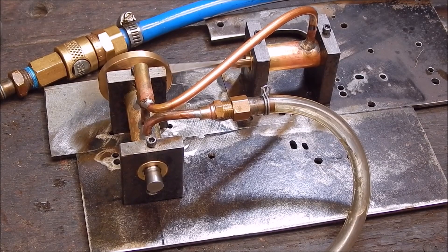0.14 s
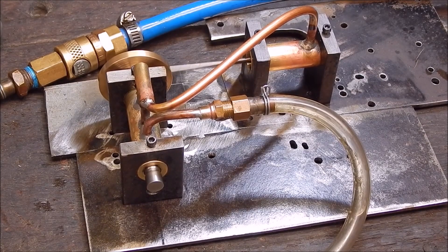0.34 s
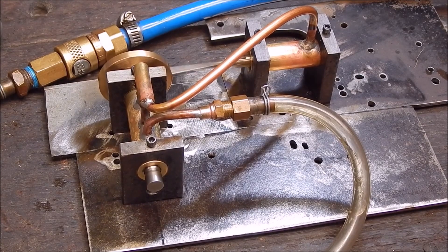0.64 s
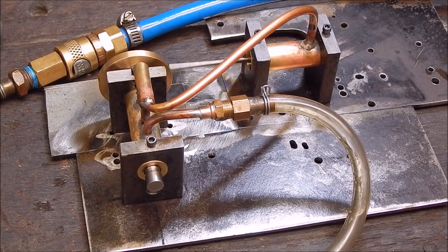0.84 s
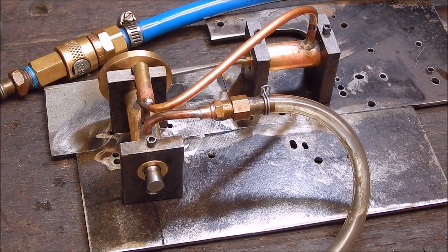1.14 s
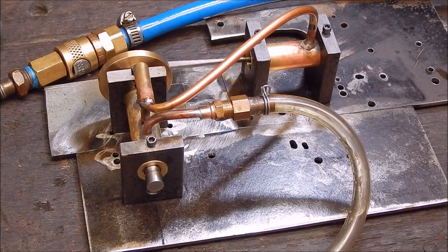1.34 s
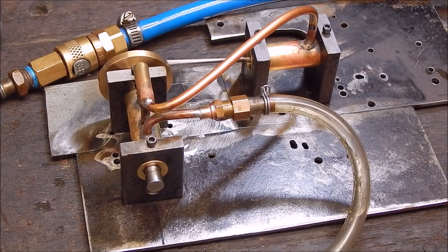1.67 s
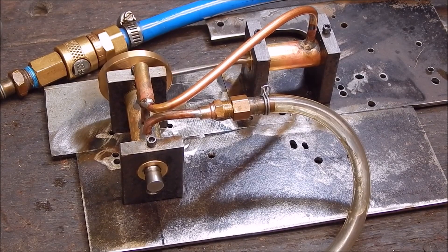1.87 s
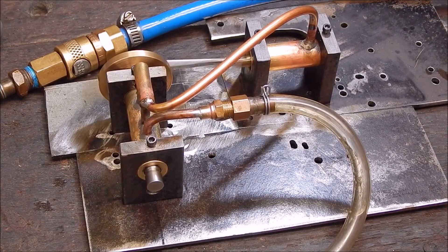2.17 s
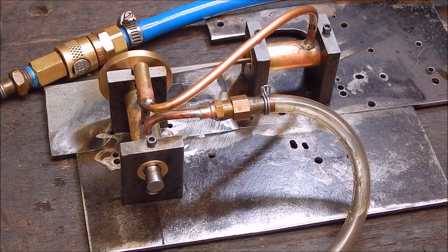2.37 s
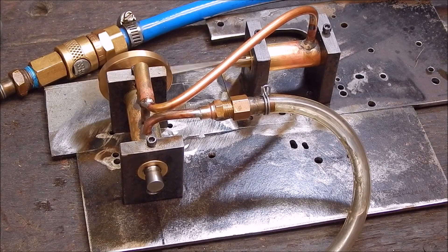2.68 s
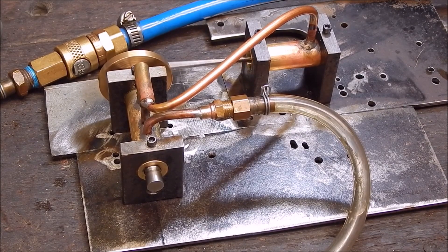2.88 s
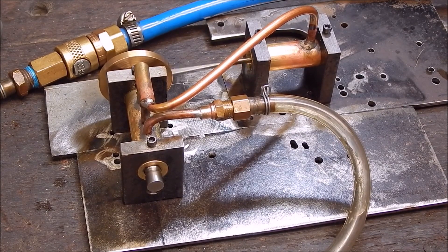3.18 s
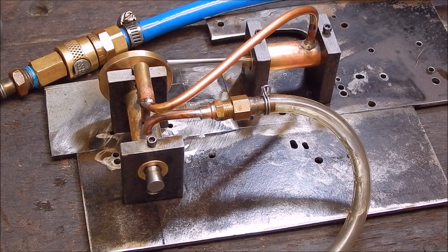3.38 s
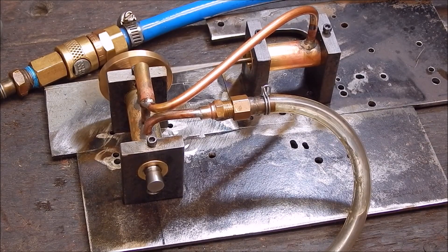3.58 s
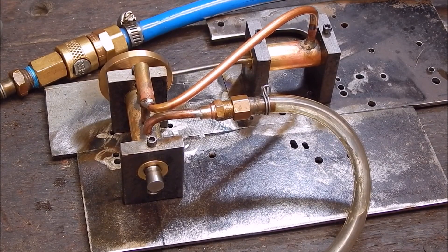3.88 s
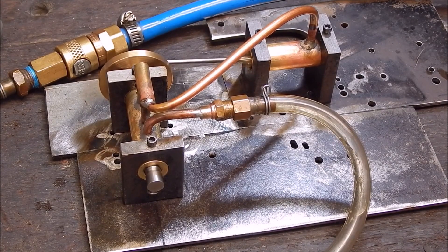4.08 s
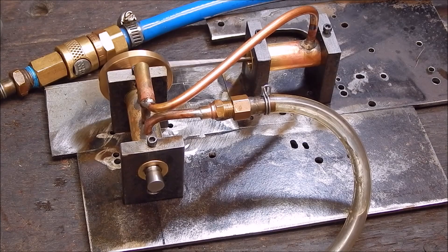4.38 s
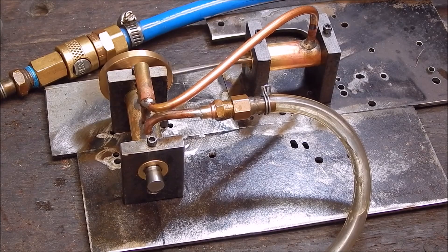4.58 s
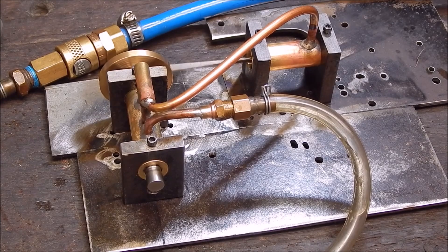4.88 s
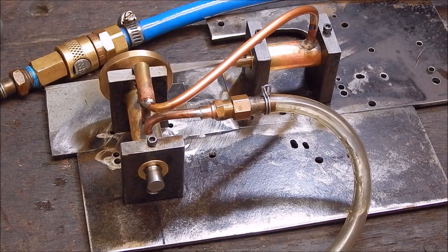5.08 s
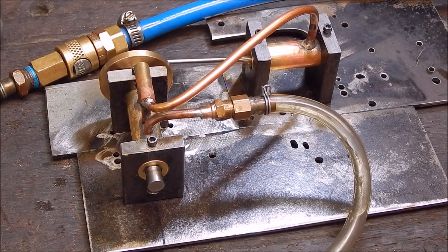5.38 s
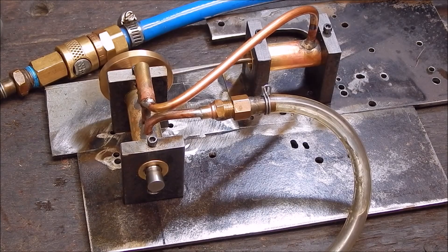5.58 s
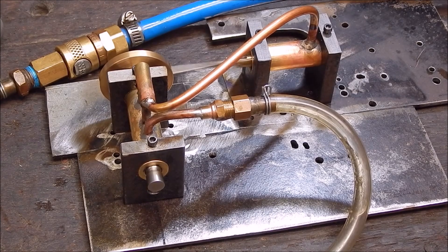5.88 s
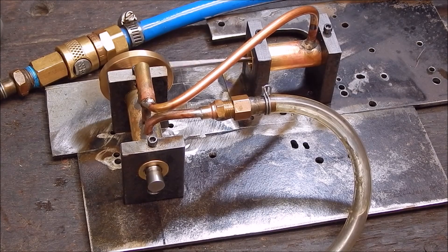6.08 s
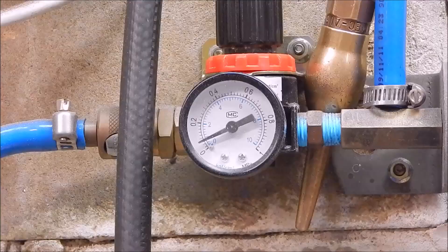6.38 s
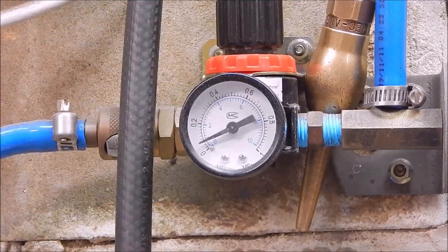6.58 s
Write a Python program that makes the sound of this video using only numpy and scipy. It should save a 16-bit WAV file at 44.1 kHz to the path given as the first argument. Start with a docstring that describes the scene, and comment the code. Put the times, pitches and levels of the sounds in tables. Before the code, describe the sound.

A small model steam engine runs on compressed air, with fast metallic clatter, hissing exhaust puffs and a thin steel plate vibrating.

```python
"""A model steam engine on compressed air, on thin steel plates on a workbench, close to the microphone.
From the start it runs at about twelve turns a second; once a turn it rocks and its base chatters on
the plate, while the exhaust puffs twice and the rod knocks between the puffs. Along the way loose steel
clacks harder, mostly with a brief dip in level after it, and past the middle the bench takes two bumps.
Near the end the sound fades out for a moment and returns from further off, with more workshop echo."""
import sys
import numpy as np
from scipy import signal
from scipy.fft import rfft, irfft, next_fast_len
from scipy.io import wavfile
from scipy.ndimage import uniform_filter1d

SR = 44100
rng = np.random.default_rng(int(sys.argv[2]) if len(sys.argv) > 2 else 0)


def generate_wav(signal):
    """Clip the signal to [-1, 1] and save it as 16-bit WAV at the path in sys.argv[1]."""
    frames = np.transpose(np.atleast_2d(signal))
    scaled = np.clip(frames, -1, 1) * 32767
    pcm = np.round(scaled).astype(np.int16)
    wavfile.write(sys.argv[1], SR, pcm)


N = 296786
TIME = np.arange(N) / SR

# blows of the base within one turn: start_ms, clack_db, push_db, frame_db, pipe_db, scatter_ms
BASE_BLOWS = [(-2, -14.5, -8, -6, -16, 1.6), (1.37, 0.5, -5.5, -9.5, -7, 1.2), (6, 1, -9, 0.5, -10, 0.77),
              (10.5, -0.5, -0.5, -3, -6.5, .9), (13, -0.5, -1, -6, -8.5, 1.1),
              (17.5, -7, -4.5, -7.5, -19, 1.2), (22.5, 0.5, -7.5, -8.5, 1, 0.46),
              (27.5, 0.5, -5.5, -12, 0.5, .5), (31, -14, -5.5, -24, -11, 1.2),
              (41.5, -1.5, -7.5, -30, -1, .8), (45.5, -6, -9, -24.5, -3.5, 1),
              (52, -4.5, -8.5, -6.5, 0, 1.2), (55.5, -18, -16, -5.5, -3.5, 1.5),
              (63, -3.5, -10, -21, -1.5, 0.66)]
# hard clacks of loose steel: start_s, level_db, dip_db (a negative dip is a lift)
LOOSE_CLACKS = [(0.148, 1, 4), (1.046, 3, -1.6), (2.035, 1.5, 3), (3.484, 2.5, 2.5), (3.565, 3, 3.5),
                (4.032, 4, 5.5), (4.347, 3.5, 1), (4.59, 2, -1.5), (4.969, 1, 5), (5.766, -4, 1.1),
                (6.001, -1.5, 3)]
# dull bumps on the bench: start_s, level_db
BENCH_BUMPS = [(4.215, -0.5), (5.763, -12)]

# speed of the crank: time_s, turns_per_s
CRANK_SPEED = [(0.0, 11.96), (0.6, 12.17), (1.1, 12.1), (1.5, 12.34), (1.9, 12.3), (2.3, 12.35),
               (2.7, 12.48), (3.2, 12.36), (3.65, 12.81), (4.05, 12.83), (4.4, 12.7), (4.85, 12.95),
               (5.3, 12.58), (5.65, 12.41), (6.0, 12.74), (6.4, 12.28)]
# how hard the rocking engine comes down: time_s, clack_db, push_db
ROCKING_EFFORT = [(0, 3.5, 2.5), (.3, -1, -3), (.55, 2, 0.5), (1.45, 3, -.5), (2.2, 1, -1), (2.6, 3, 1),
                  (3, 4, 0.5), (3.4, 1, -1.5), (3.6, -6.5, -5), (3.95, 1.5, -1.5), (4.35, -2, -1),
                  (4.6, 1, 0), (5.05, -1, -3), (5.3, 0.5, -3), (5.45, 4, 1.5), (5.8, 0, 0.5),
                  (6.05, 2.5, 0), (6.4, 2.5, -.5)]
# how fully the base lands on the plate, less so once it has shifted: time_s, level_db
BASE_SEATING = [(0, 1), (3.4, 1.5), (3.5, -0.5), (5.4, 1), (5.7, 0.5)]
# air pressure, heard in the puffs and the ring of the pipe: time_s, level_db
AIR_PRESSURE = [(0, 1.8), (.8, 1.1), (1.8, -0.6), (2.9, 0), (3.4, 0.1), (4.6, 1.5), (5.2, 0.5), (6.3, 2)]

# resonances of each part: pitch_hz, width_hz, level_db
STEEL_MODES = [(4270, 53, 3.5), (4516, 120, -1), (5430, 160, 2), (6100, 51, 0.5), (6940, 174, 0),
               (8345, 58, 2.5), (9600, 330, 6.5), (10200, 270, 4.5), (11560, 145, 0.5)]
PING_MODES = [(9690, 1070, 0)]  # the stiff contact
FRAME_MODES = [(5122, 71, 21), (4870, 40, 10), (5260, 63, -5)]
PLATE_MODES = [(88.2, 8.1, -12.5), (210.4, 7.3, -1), (310.2, 3.2, 0.5), (345.2, 10, 1), (385, 30, -21),
               (421, 32, -2.5), (552, 27, -11.5), (657, 36, -5), (796, 52.5, -4), (837, 36, -9),
               (928, 10, -13.5), (1020, 23, -13), (1172, 24, -14.5)]
BENDING_MODES = [(198, 6.6, 0), (210.5, 3.8, 0.5), (345.2, 4.3, -5.5), (443, 41, -20)]  # slow flexing of the plate
PIPE_MODES = [(2057, 45, 1.5), (2146, 45, 2.5), (2282, 36, -1), (2601, 21, 3), (2760, 47, -12.5),
              (2819, 54, 2.5), (3014, 88, 1), (3640, 110, -8.5)]
ROD_MODES = [(1592, 25.5, 12.5), (1550, 30, -28), (1480, 23, -0.5)]
BENCH_MODES = [(217, 38, 1), (250, 78, -6), (130, 43, -16), (350, 110, -21)]
# broad responses under the resonances: frequency_hz, level_db
STEEL_RESPONSE = [(100, -38.5), (1300, -15.5), (2500, -7.5), (3300, -4), (4000, -8.5), (5600, -11),
                  (6600, -7.5), (7500, -11.5), (8800, -18), (11000, -9), (12000, -22.5)]
PLATE_RESPONSE = [(30, -34), (150, -32.5), (300, -46), (480, -33), (900, -40), (1300, -29), (2200, -9),
                  (4000, -60), (12000, -58)]
EXHAUST_RESPONSE = [(100, -36.5), (500, -21), (1300, -23), (1800, -22), (2470, -50), (3300, -13),
                    (4000, -12.5), (4500, -9), (6500, -12.5), (7500, -15.5), (9800, -14.5), (12000, -19.5)]

# bands where the bench's reflection cancels at the microphone: centre_hz, width_hz
REFLECTION_NULLS = [(2465, 110), (7500, 90)]
# steady air leak and workshop rumble: frequency_hz, level_db
ROOM_TONE = [(20, -19), (45, -2), (90, 0.5), (200, 2.5), (500, -2.5), (1300, -15.5), (2100, -0.5),
             (2470, -3), (2900, -2.5), (4000, -4.5), (7500, -10), (10000, -4), (12000, -5.5)]
# a deep rumble that comes and goes: time_s, level_db
RUMBLE_SWELL = [(0, -16), (1.3, 0), (1.9, 1), (2.6, -2), (2.8, 0), (3.6, -18), (6.4, -9), (6.6, 13)]
# stereo width, side minus mid: frequency_hz, side_db
STEREO_WIDTH = [(50, -6.5), (200, -14.5), (700, -5.5), (2500, -10), (5000, -1.5), (10000, -2), (12000, -1)]
# the fade out and partway back in: time_s, gain
FADE_GAIN = [(6.415, 1), (6.432, 0.12), (6.455, 0.0006), (6.562, 0.00063), (6.574, 0.33)]

FIRST_TURN_S, TURN_SCATTER_S, TURN_SCATTER_DB, PUFF_SCATTER_DB = 0.055, 0.0005, 0.75, 0.8
PUSH_SCATTER_SHARE = 0.5  # the heavy pushes keep time better than the clacks
REBOUND_S, REBOUND_DB = 0.0245, -6
DIP_LAG_S, DIP_FALL_S, DIP_S_PER_DB = 0.012, 0.006, 0.0336  # a deeper dip lasts longer
FAR_S, FAR_TURN_S, FAR_TURNS_PER_S = 6.5, 6.562, 13  # from FAR_S on the engine is further off
FAR_CLACK_DB, FAR_PUSH_DB, FAR_AIR_DB = 2.5, 8.5, 1.5  # stroke strengths ahead of the fade
CEILING, TOP_HZ = 0.44, 12150  # saturation as a share of full scale; treble cutoff


def chatter(turns, hard_db, push_db, air_db):
    """The base bounces on the plate: steel clacks, frame and pipe ring and the thin plate drums."""
    start_ms, clack_db, thud_db, frame_db, pipe_db, scatter_ms = np.transpose(BASE_BLOWS)
    late, force, twist = rng.standard_normal((len(turns), 3, len(start_ms))).transpose(1, 0, 2)
    times = turns[:, None] + (start_ms + scatter_ms * late) / 1000
    hardness = hard_db[:, None] + 2.25 * force
    # every clack ends in a short buzz of smaller bounces
    clacks = level(contact(times, hardness + clack_db, decay_s=0.00068, rise_s=0.00062), -1.5)
    buzz = level(contact(times, hardness + clack_db, decay_s=0.0063, rise_s=0.0012), 0)
    steel = level(ring(clacks + buzz, STEEL_MODES, STEEL_RESPONSE), -32.5)
    # the stiff contact itself pings for about a millisecond
    spikes = impulses(times, undb(hardness + clack_db + 4.0 * twist))[None]
    ping = level(ring(ring(spikes, PING_MODES), PING_MODES), -42.5)
    strike = level(contact(times, hardness + frame_db, decay_s=0.0017), 0)
    strike += level(impulses(times, undb(hardness + frame_db)), -1.5)
    frame = level(ring(strike, FRAME_MODES), -39)
    weight_db = push_db[:, None] + thud_db + 1.5 * force
    push_times = turns[:, None] + (start_ms + PUSH_SCATTER_SHARE * scatter_ms * late) / 1000
    push = level(contact(times, weight_db, decay_s=0.0074, rise_s=0.0011), -1)
    push += level(impulses(push_times, undb(weight_db)), 0)
    plate = level(ring(push, PLATE_MODES, PLATE_RESPONSE), -38)
    jolt = contact(times, air_db[:, None] + pipe_db + 1.4 * twist, decay_s=0.0023, rise_s=0.00043)
    pipe = level(ring(jolt, PIPE_MODES), -38)
    return steel + ping + frame + pipe + plate * undb([[0.5], [-0.5]])  # plate just left of centre


def rocking(turns, push_db):
    """Once a turn the engine's weight lands softly on the plate, bends it and rebounds."""
    weight = undb(0.7 * push_db + follow(BASE_SEATING, turns))
    landing = impulses(turns + 0.00399, weight)
    rebound = impulses(turns + 0.0039 + REBOUND_S, weight * undb(REBOUND_DB))
    soft_force = signal.sosfilt(signal.butter(2, 520, fs=SR, output="sos"), landing + rebound)
    return level(ring(soft_force[None], BENDING_MODES), -45)


def exhaust(turns, air_db):
    """Two puffs a turn hiss through the copper pipe; oil makes them sputter."""
    first = puff(turns, air_db - 0.5, open_s=0.013, rise_s=0.0051, fall_s=0.032)
    second = puff(turns, air_db, open_s=0.044, rise_s=0.0037, fall_s=0.024)
    grain = uniform_filter1d(rng.standard_normal(N), size=70)
    sputter = undb(level(grain, 0) * 0.93)
    hiss = np.hypot(first, second) * sputter * noise()
    return level(ring(hiss, PIPE_MODES, EXHAUST_RESPONSE), -35.5)


def puff(turns, db, open_s, rise_s, fall_s):
    """A port opens once a turn; the air flow dies as the cylinder empties."""
    opens = turns + open_s + 0.0014 * rng.standard_normal(len(turns))
    strength = undb(db + PUFF_SCATTER_DB * rng.standard_normal(len(turns)))
    age = np.arange(SR // 8) / SR
    flow = (1 - np.exp(-(age / rise_s) ** 2)) * np.exp(-(age / fall_s) ** 2)
    return signal.oaconvolve(impulses(opens, strength), flow)[:N]


def rod(turns, push_db):
    """Play in the rod is taken up as the piston reverses: a scrape, then a knock."""
    times = turns + 0.02671 + 0.0015 * rng.standard_normal(len(turns))
    scrape = level(contact(times - 0.012, 0.4 * push_db, decay_s=0.019, rise_s=0.011), 4.5)
    knock = level(impulses(times, undb(0.52 * push_db)), 0)
    return level(ring(scrape + knock, ROD_MODES), -47)


def crank():
    """Start time of every turn: the crank angle is the running sum of its speed."""
    step_s = 0.001
    t = np.arange(-0.1, FAR_S, step_s)
    angle = np.cumsum(follow(CRANK_SPEED, t)) * step_s
    angle -= np.interp(FIRST_TURN_S, t, angle)
    near = np.interp(np.arange(-1, np.floor(angle[-1]) + 1), angle, t)
    far = np.arange(FAR_TURN_S, TIME[-1], 1 / FAR_TURNS_PER_S)
    turns = np.concatenate([near, far])
    return turns + TURN_SCATTER_S * rng.standard_normal(len(turns))


def strokes(turns):
    """Clack, push and air levels per turn: close up they follow effort and pressure, far off they hold."""
    time_s, hard_db, push_db = np.transpose(ROCKING_EFFORT)
    chance_db = TURN_SCATTER_DB * rng.standard_normal(len(turns))
    far = turns > FAR_S
    return (np.where(far, FAR_CLACK_DB, np.interp(turns, time_s, hard_db) + chance_db),
            np.where(far, FAR_PUSH_DB, np.interp(turns, time_s, push_db) + chance_db),
            np.where(far, FAR_AIR_DB, follow(AIR_PRESSURE, turns)))


def loose_steel():
    """Now and then loose steel strikes harder and rings."""
    start_s, level_db, _ = np.transpose(LOOSE_CLACKS)
    strikes = contact(start_s, level_db, decay_s=0.0037, rise_s=0.0017)
    return level(ring(strikes, STEEL_MODES, STEEL_RESPONSE), -45)


def dips():
    """After most hard clacks the level dips briefly and comes back; after two it lifts."""
    gain_db = np.zeros(N)
    for start_s, _, dip_db in LOOSE_CLACKS:
        age = np.maximum(TIME - start_s - DIP_LAG_S, 0)
        hold_s = DIP_S_PER_DB * max(abs(dip_db), 0.5)
        gain_db -= dip_db * (1 - np.exp(-age / DIP_FALL_S)) * np.exp(-(age / hold_s) ** 4)
    return undb(gain_db)


def bench_bumps():
    """The bench takes a dull bump and shudders."""
    start_s, level_db = np.transpose(BENCH_BUMPS)
    bump = level(impulses(start_s, undb(level_db)), 0)
    shudder = level(contact(start_s - 0.004, level_db, decay_s=0.046, rise_s=0.003), 0)
    return level(ring(bump + shudder, BENCH_MODES), -53)


def workshop(x, t60_s, wet_db, far_boost_db):
    """Bench and walls answer within milliseconds, above the bass; further off their share grows."""
    age = np.arange(SR // 2) / SR
    envelope = np.exp(-np.log(1000) * age / t60_s) * (1 - np.exp(-age / 0.003))
    tail = rng.standard_normal((2, len(age))) * envelope
    tail /= np.sqrt(np.sum(tail ** 2, axis=1, keepdims=True))
    tail = signal.sosfilt(signal.butter(1, 500, "high", fs=SR, output="sos"), tail)
    echo = signal.oaconvolve(x, tail, axes=1)[:, :N]
    wet = undb(wet_db + far_boost_db * (TIME > FAR_S))
    return (x + wet * echo) / np.sqrt(1 + wet ** 2)


def bench_nulls(x, depth):
    """At the microphone the bench's reflection partly cancels the direct sound in narrow bands."""
    for hz, width_hz in REFLECTION_NULLS:
        notched = signal.lfilter(*signal.iirnotch(hz, hz / width_hz, SR), x)
        x = x + depth * (notched - x)
    return x


def background():
    """Room tone behind the engine: a steady leak of air, and a deep rumble that comes and goes."""
    rumble = level(ring(noise(), [(43.3, 9, 0)]), -57) * undb(follow(RUMBLE_SWELL, TIME))
    return level(noise(ROOM_TONE), -34.5) + rumble


def contact(times, db, decay_s, rise_s=0.00024):
    """Rough faces meet at many points: each blow is a burst of tiny impacts that builds and dies."""
    energy = impulses(times, undb(db) ** 2)
    for seconds in (rise_s, rise_s, decay_s):
        energy = signal.lfilter([1], [1, -np.exp(-2 / (seconds * SR))], energy)
    return np.sqrt(energy) * noise()


def ring(x, modes, response=None, size=16384):
    """Pass a force through resonances that stand on a broad response, so that blows ring on."""
    hz = np.arange(size // 2 + 1) * SR / size + 1
    power = sum(undb(db) ** 2 / (1 + ((hz - f * f / hz) / width) ** 2) for f, width, db in modes)
    if response is not None:
        power = power + curve(response, hz) ** 2
    # minimum phase: nothing rings before the blow
    cepstrum = irfft(np.log(power) / 2)
    cepstrum[1:size // 2] *= 2
    cepstrum[size // 2 + 1:] = 0
    ringing = irfft(np.exp(rfft(cepstrum)))[None, :size // 2]
    return signal.oaconvolve(x, ringing, axes=1)[:, :N]


def noise(colour=None):
    """Stereo noise, narrow in the bass and wide in the treble."""
    size = next_fast_len(N)
    hz = np.arange(size // 2 + 1) * SR / size
    mid, side = rfft(rng.standard_normal((2, size)))
    side = side * curve(STEREO_WIDTH, hz)
    gain = 1 if colour is None else curve(colour, hz)
    return irfft(np.array([mid + side, mid - side]) * gain, size)[:, :N]


def impulses(times, sizes):
    """One spike per event."""
    inside = (times >= 0) & (times < TIME[-1])
    return np.bincount((times[inside] * SR).astype(int), sizes[inside], N)


def follow(points, times):
    """Value of a (time_s, value) table at the given times."""
    return np.interp(times, *np.transpose(points))


def curve(points, hz):
    """Gain of a (frequency_hz, level_db) table at the given frequencies."""
    frequency_hz, level_db = np.transpose(points)
    return undb(np.interp(np.log(hz + 1), np.log(frequency_hz), level_db))


def level(x, db):
    """Scale to an rms level."""
    return x * undb(db) / np.sqrt(np.mean(x ** 2))


def undb(db):
    """Decibels to gain."""
    return 10 ** (np.asarray(db) / 20)


def scene():
    """The engine, timed by its crank and coloured by bench and workshop;
    the level dips briefly after most hard clacks."""
    turns = crank()
    hard_db, push_db, air_db = strokes(turns)
    base = chatter(turns, hard_db, push_db, air_db) + rocking(turns, push_db)
    direct = base + exhaust(turns, air_db) + rod(turns, push_db) + loose_steel() + bench_bumps()
    room = workshop(direct, t60_s=0.53, wet_db=-9, far_boost_db=4.5) + background()
    return undb(0.6) * dips() * bench_nulls(room, depth=0.6)


def record(dry):
    """Saturation rounds the peaks; the sound fades out and returns quieter; the top is cut steeply."""
    rounded = CEILING * np.tanh(dry / CEILING)
    faded = rounded * follow(FADE_GAIN, TIME)
    return signal.sosfilt(signal.ellip(12, 0.2, 85, TOP_HZ, fs=SR, output="sos"), faded)


dry = scene()
out = record(dry)
generate_wav(out)
```